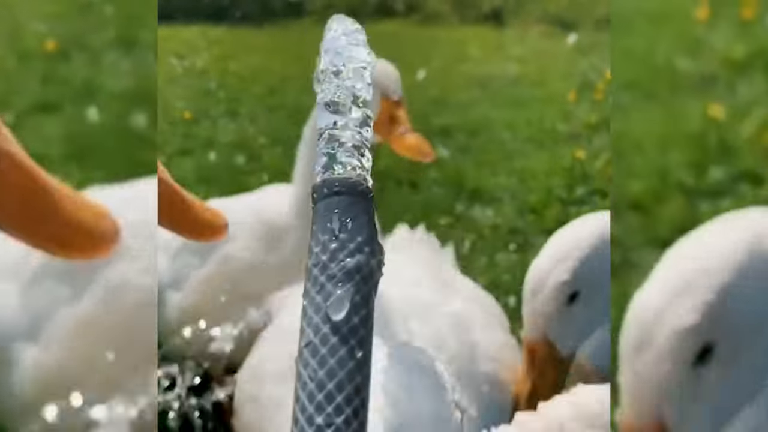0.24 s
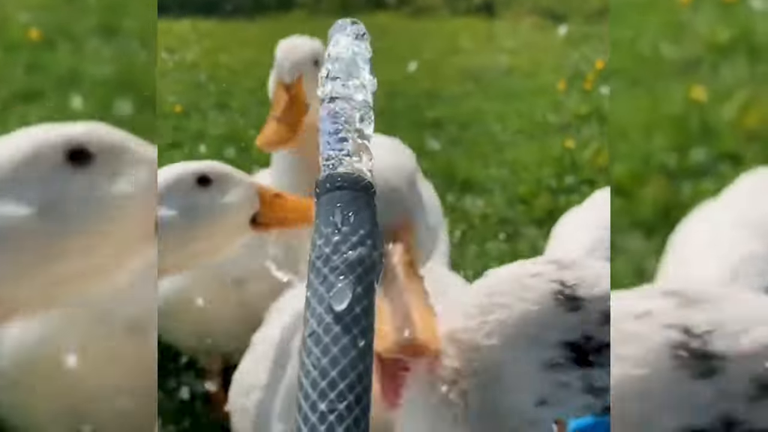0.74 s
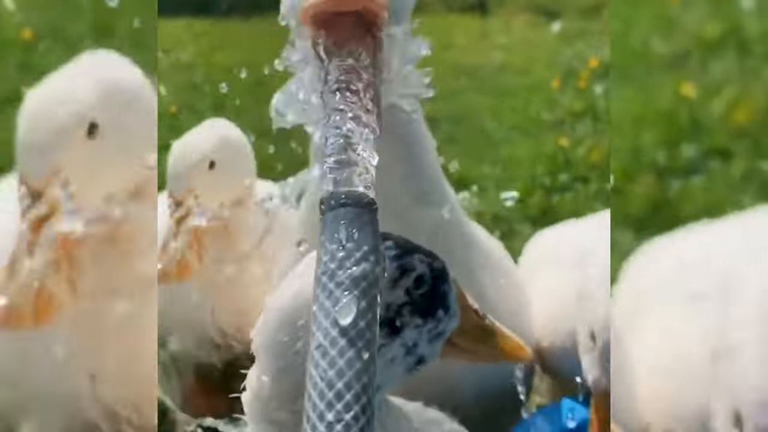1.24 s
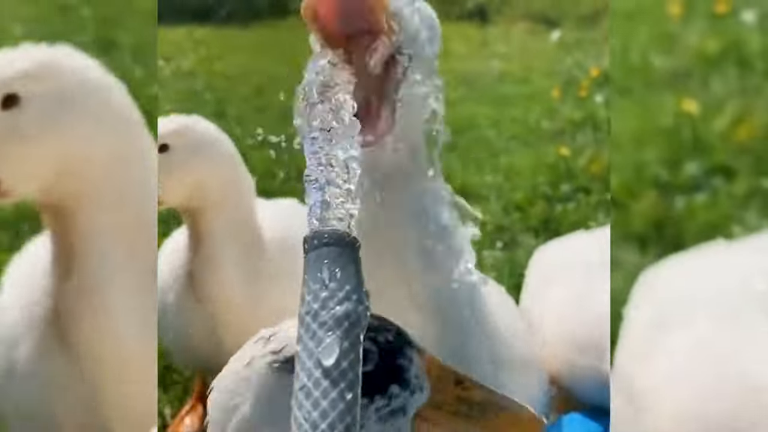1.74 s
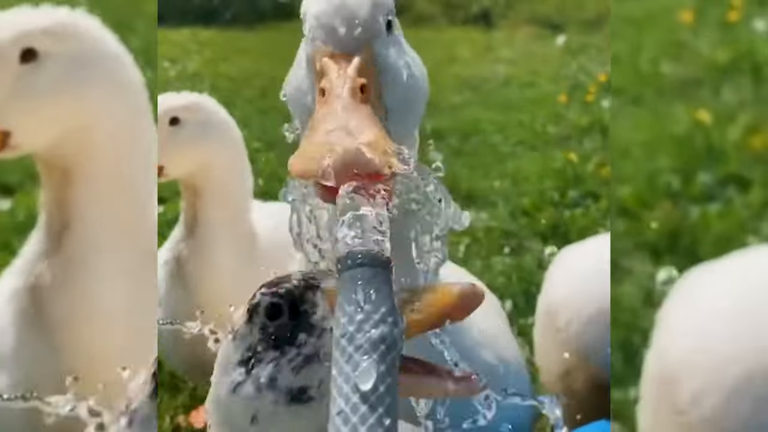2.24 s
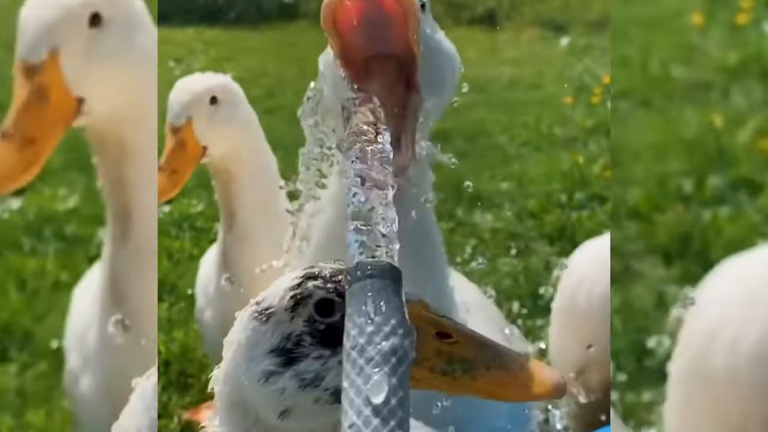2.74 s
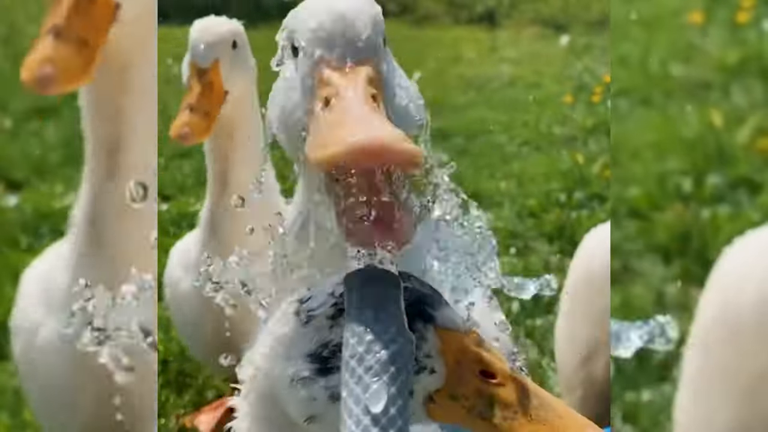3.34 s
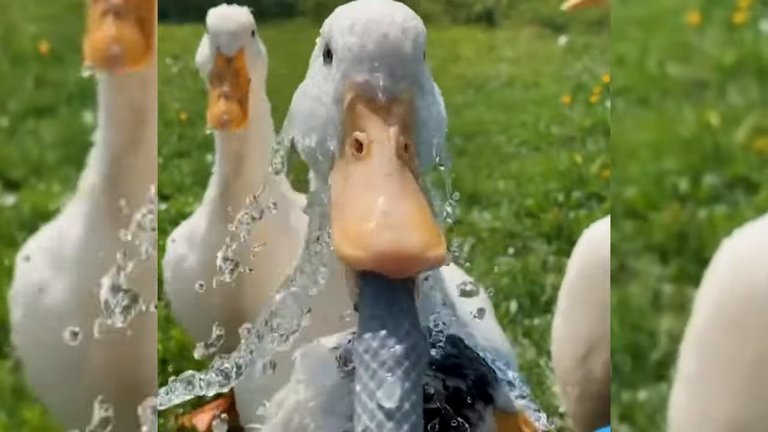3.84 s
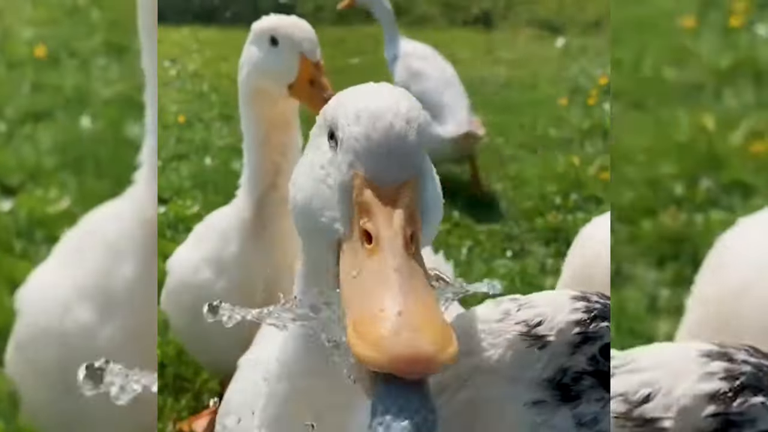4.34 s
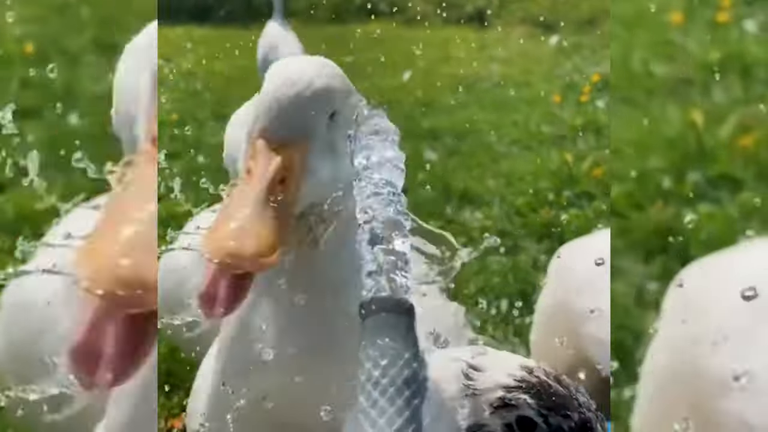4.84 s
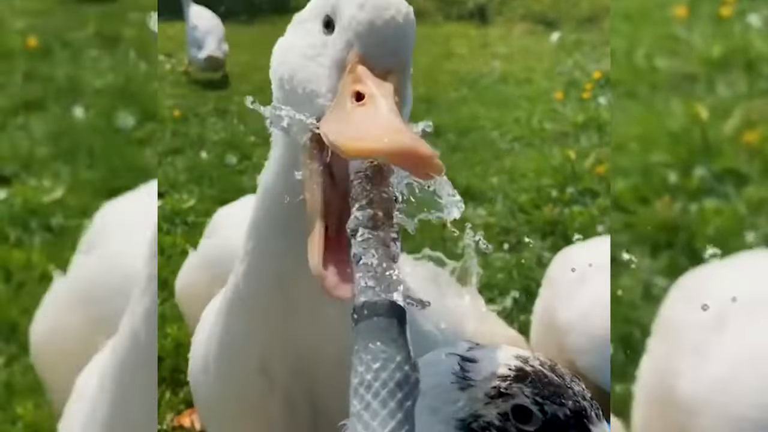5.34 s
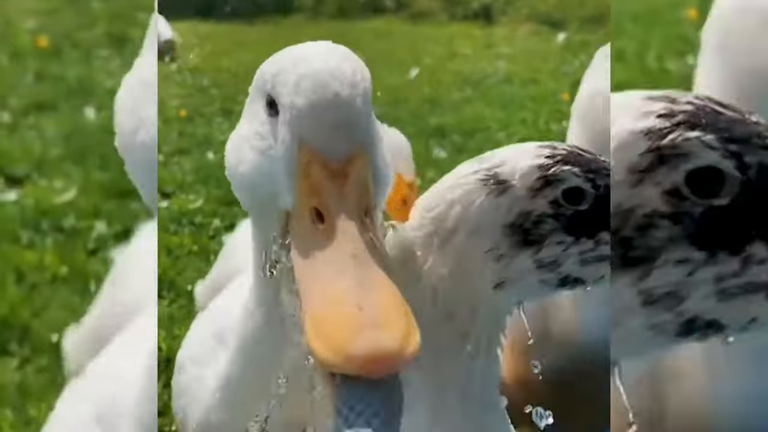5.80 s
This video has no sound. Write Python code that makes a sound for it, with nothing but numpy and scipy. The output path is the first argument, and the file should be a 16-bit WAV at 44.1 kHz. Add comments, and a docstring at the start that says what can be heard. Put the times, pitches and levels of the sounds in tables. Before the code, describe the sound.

Ducks crowd a running hose on a lawn, giving short hoarse quacks and squeaks while bills clap and water splashes close by.

```python
"""Ducks crowd round a running garden hose on a lawn and snap at the jet, close to the microphone.
Near quacks are pulse trains ringing throat and chest; thin near-sine squeaks, mostly falling, precede many.
Bills clap as clicks in a mouth cavity, slaps of water are noise bursts, drips are rising sines.
Behind them the flock chatters in slow pulses, ringing grains make the splash, spray and lapping,
and low noise buffets the microphone."""
import sys
import numpy as np
from scipy import signal
from scipy.fft import rfft, irfft, next_fast_len
from scipy.io import wavfile
from scipy.ndimage import uniform_filter1d, map_coordinates

SR = 44100
rng = np.random.default_rng(int(sys.argv[2]) if len(sys.argv) > 2 else 0)


def bounce(signal):
    """Save signal as a 16-bit WAV file at the path given by the first command-line argument."""
    frames = np.transpose(np.atleast_2d(signal))
    limited = np.clip(frames, -1, 1)
    pcm = np.round(limited * 32767).astype(np.int16)
    wavfile.write(sys.argv[1], SR, pcm)


N = 267642
TIME = np.arange(N) / SR
# In all tables, levels in dB are relative: most layers add their own trim.


def from_db(db):
    """Decibels to amplitude."""
    return 10 ** (np.asarray(db) / 20)


def rms_one(x):
    """Scale to an rms of 1."""
    return x / np.sqrt(np.mean(x ** 2) + 1e-20)


def in_time(rows, t=TIME):
    """Columns of a curve over time, joined by straight lines."""
    s, *columns = np.transpose(rows)
    return [np.interp(t, np.sort(s), column) for column in columns]


def progress(seconds):
    """From 0 to 1 over a length of time."""
    return np.linspace(0, 1, max(int(seconds * SR), 2))


def add(out, s, x):
    """Mix x in at time s."""
    i = max(int(s * SR), 0)
    out[..., i:i + x.shape[-1]] += x[..., :max(N - i, 0)]


def coloured(x, points):
    """Filter by a spectrum joined up over log frequency."""
    hz, db = np.transpose(points)
    size = next_fast_len(N + 4096)
    grid = np.maximum(np.arange(size // 2 + 1) * SR / size, 1)
    gain = from_db(np.interp(np.log(grid), np.log(hz), db))
    return irfft(rfft(x, size) * gain, size)[..., :N]


def drift(rate, size):
    """A wandering line through normal random values, rate of them a second."""
    steps = np.arange(size) * rate / SR
    count = int(steps[-1]) + 2
    return np.interp(steps, np.arange(count), rng.standard_normal(count))


def ring(x, hz, t60):
    """A unit click sets a sine of height 1 ringing; it falls 60 dB in t60 seconds."""
    r, w = from_db(-60 / (t60 * SR)), 2 * np.pi * hz / SR
    return signal.lfilter([0, np.sin(w)], [1, -2 * r * np.cos(w), r * r], x + 1e-18)


def resonate(x, modes):
    """Parallel resonances of (Hz, width in Hz, dB), signs alternating."""
    out = 0
    for k, (hz, width, db) in enumerate(modes):
        t60 = np.log(1000) / np.pi / width
        out = out + (-1) ** k * from_db(db) * width * ring(x, hz, t60)
    return out


def syrinx(pitch, rough, jitter=.065, shimmer_db=5.5, air=.2, closing=1.0, air_hz=1800):
    """One pulse a cycle, uneven in time and strength, each followed by a puff of bright turbulent air."""
    size = len(pitch)
    cycles = np.cumsum(pitch * (1 + jitter * rough * drift(300, size))) / SR
    clicks = np.diff(np.floor(cycles), prepend=-1)
    pulses = clicks * from_db(shimmer_db * rough * drift(398.6, size))
    bright = signal.butter(1, air_hz, "high", fs=SR, output="sos")
    turbulence = signal.sosfilt(bright, rng.standard_normal(size))
    return pulses + air * rough * np.exp(-closing * (cycles % 1)) * turbulence


# Every quack swells and dies by the same law: depths in dB, and how each slope bends.
SWELL_DB, SWELL_BEND, FADE_DB, FADE_BEND = 17, 1.3, 22, 1.6
PITCH_BEND = 1.3   # the pitch lingers near its value at the loudest moment


def blow(attack, release, opening_hz, loudest_hz, closing_hz):
    """Pitch and level (dB under the peak) of one push of air: it builds, then slackens."""
    before, after = 1 - progress(attack), progress(release)
    rise = loudest_hz + (opening_hz - loudest_hz) * before ** PITCH_BEND
    fall = loudest_hz + (closing_hz - loudest_hz) * after ** PITCH_BEND
    db = -np.r_[SWELL_DB * before ** SWELL_BEND, FADE_DB * after ** FADE_BEND]
    return np.r_[rise, fall], db


# Throat resonances by kind of voice. Each row: centre in Hz, width in Hz, level in dB.
THROAT_MODES = { "hoarse": [(440, 77, -5.5), (690, 500, -27), (850, 266, -2.5), (1320, 130, 1.5),
                (1640, 160, 0), (2440, 480, -6), (3500, 1020, -15.5), (5470, 410, -9), (7490, 720, -16.5),
                (11100, 2800, -31)], "bright": [(500, 100, -5), (1050, 820, -7.5), (1650, 304, 1.5),
                (2700, 380, -5.5), (3870, 1800, -11.5), (6140, 1070, -11.5), (7500, 440, -7.5),
                (11700, 8100, -28)], "brassy": [(546, 150, -2.5), (830, 160, 0), (1330, 213, 7.5),
                (1670, 260, -12), (2570, 330, -10), (3370, 390, 2.5), (3800, 135, 7.5), (5450, 1800, -8),
                (7900, 540, -18), (11400, 15000, -32.5)], "throaty": [(450, 180, -17.5), (810, 900, -9.5),
                (1200, 270, 4.5), (1610, 280, -4), (2320, 770, -6.5), (3150, 1000, -8.5)],
                "soft": [(800, 520, -13.5), (1200, 210, -0.5), (1362, 260, -5.5), (1750, 217, -10.5),
                (2100, 170, -52), (3390, 240, -27)]}
# Near quacks. Each row: throat, loudest moment in seconds, attack in seconds, release in seconds,
# level in dB, opening pitch in Hz, pitch when loudest in Hz, closing pitch in Hz,
# roughness [0-1] at full effort, chest level in dB.
NEAR_QUACKS = [ ("throaty", .328, .006, .045, -33, 335, 330, 280, 1, 0),
               ("throaty", .367, .016, .032, -30, 295, 246, 160, 1, 0),
               ("hoarse", .820, .040, .036, -23, 510, 435, 360, .54, -13),
               ("hoarse", 1.115, .068, .042, -23, 450, 390, 335, .58, -4),
               ("throaty", 1.148, .012, .022, -28, 210, 172, 157, .4, 4),
               ("throaty", 1.428, .036, .022, -31, 270, 200, 159, .45, 13),
               ("hoarse", 1.620, .052, .048, -19.5, 500, 260, 143, .3, 4),
               ("throaty", 1.728, .034, .038, -25.5, 260, 195, 150, .33, 12),
               ("hoarse", 1.975, .048, .046, -15, 460, 275, 165, .26, 0),
               ("soft", 2.128, .018, .016, -30, 219, 190, 154, .38, -7),
               ("soft", 2.401, .034, .027, -24, 172, 185, 145, .59, -13),
               ("bright", 3.134, .026, .046, -16, 250, 237, 190, .41, -40),
               ("brassy", 3.402, .04, .051, -14.8, 200, 280, 200, .36, -37),
               ("throaty", 3.793, .036, .018, -32.5, 250, 190, 165, .5, -19),
               ("soft", 4.260, .035, .04, -37, 225, 191, 160, .38, -12),
               ("throaty", 4.308, .055, .036, -39, 410, 438, 410, .16, -29),
               ("soft", 4.574, .022, .04, -32, 164, 146, 130, 1, -6),
               ("hoarse", 4.815, .062, .04, -22.5, 500, 439, 380, .62, -9),
               ("throaty", 4.846, .012, .024, -29, 230, 207, 181, .7, -3),
               ("soft", 5.673, .026, .035, -15.5, 160, 201, 139, .05, -30)]


def quacks(crop_hz=680, crop_width_hz=260, crop_db=-6.5, chest_hz=195, chest_width_hz=170, low_cut_hz=150,
           level_db=0.3, sag=.03, slack=0.31, dull_hz=3000, treble_fade=0.22):
    """Pulses ring the throat and, in the nearest birds, chest and neck; weak blowing is rougher and duller."""
    out = np.zeros(N)
    low_cut = signal.butter(2, low_cut_hz, "high", fs=SR, output="sos")
    dull = signal.butter(1, dull_hz, fs=SR, output="sos")
    for throat, s, attack, release, peak_db, opening_hz, loudest_hz, closing_hz, rough, chest_db in NEAR_QUACKS:
        pitch, db = blow(attack, release, opening_hz, loudest_hz, closing_hz)
        effort, size = from_db(db), len(db)
        # the resonances sink as the bill closes: the throat plays ever more slowly, the pitch made up for it
        speed = np.linspace(1 + sag, 1 - sag, size)
        place = np.cumsum(speed)
        throat_pitch = np.interp(np.arange(size), place, pitch / speed)
        pulses = syrinx(throat_pitch, rough * (1 + slack * (1 - effort)))
        chest = (chest_hz, chest_width_hz, chest_db)
        crop = (crop_hz, crop_width_hz, chest_db + crop_db)
        voice = resonate(pulses, [chest, crop] + list(THROAT_MODES[throat]))
        voice = signal.sosfilt(low_cut, map_coordinates(voice, [place], order=3))
        low = signal.sosfilt(dull, voice)
        voice = low + (voice - low) * effort ** treble_fade
        # even out the loudness, so that effort alone shapes it
        voice /= np.sqrt(uniform_filter1d(voice ** 2, size=600) + 1e-9)
        shape = effort * from_db(peak_db + level_db) * signal.windows.tukey(size, .08)
        add(out, s - attack, voice * shape)
    return out


# A squeak swells, peaks part-way through and fades, while its glide levels off.
SQUEAK_SWELL_DB, SQUEAK_PEAK_SHARE, SQUEAK_FADE_DB, SQUEAK_GLIDE_BEND = 13, .6, 6, 1.6
# Short squeaks, most of them just before a quack.
# Each row: start in seconds, length in seconds, first pitch in Hz, last pitch in Hz, level in dB.
SHORT_SQUEAKS = [(.318, .045, 1200, 1500, -38), (.768, .055, 1294, 1050, -28.5),
                 (1.052, .078, 1420, 1160, -27.5), (1.555, .05, 1314, 1000, -31),
                 (1.912, .052, 1483, 1090, -26), (3.086, .034, 1060, 910, -35),
                 (3.352, .042, 1400, 980, -22), (3.592, .03, 950, 790, -42), (3.762, .036, 930, 870, -36.5),
                 (4.762, .052, 1427, 1140, -28), (5.51, .045, 1010, 950, -44),
                 (5.624, .035, 1050, 870, -35)]


def squeaks(flutter_db=2.6, second_db=-16, third_db=-23, level_db=3.0):
    """The syrinx sings a short, wavering near-sine with two faint overtones."""
    out = np.zeros(N)
    for s, length, first_hz, last_hz, peak_db in SHORT_SQUEAKS:
        u = progress(length)
        size = len(u)
        pitch = last_hz + (first_hz - last_hz) * (1 - u) ** SQUEAK_GLIDE_BEND
        drop_db = np.interp(u, [0, SQUEAK_PEAK_SHARE, 1], [SQUEAK_SWELL_DB, 0, SQUEAK_FADE_DB])
        waver = 1 + .025 * drift(700, size) + .03 * drift(2500, size)
        phase = 2 * np.pi * np.cumsum(pitch * waver) / SR
        tone = np.sin(phase) + from_db(second_db) * np.sin(2 * phase) + from_db(third_db) * np.sin(3 * phase)
        level = from_db(peak_db - drop_db + level_db + flutter_db * drift(646, size))
        add(out, s, np.sqrt(2) * tone * level * signal.windows.tukey(size, .2))
    return out


# Bills clapping and gulping in the jet.
# Each row: start in seconds, peak in dB, low thump in dB and hollow ring in dB (both scaled by their shares).
BILL_SNAPS = [(.072, -30, -13, -4), (.284, -29.5, 1, -7), (.327, -21, -14, -5), (.333, -23.5, -6, -8),
              (.36, -27, 4, -15), (.39, -24, 5, -3), (.53, -27, -10, 0), (.558, -26.5, 1, -4),
              (.737, -26.5, 10, 2.5), (.86, -22.5, -10, -3.5), (1.026, -28, -9, -18), (1.147, -16, -24, 4),
              (1.409, -26, -3, 9), (1.535, -21.5, -8, -.5), (1.893, -23, -20, -9.5), (2.344, -29, 17, -2),
              (3.056, -28, -33, -7.5), (3.316, -29, -34, 6), (3.335, -24, -25, -4.5), (3.619, -30, -21, 13),
              (3.798, -23.5, -18, -8), (4.248, -28, -34, -8), (4.541, -31, -19, -6),
              (4.564, -23.5, -24, -4), (4.744, -29, -20, -5.5), (4.797, -25, 0, -15), (4.899, -33, -8, -25),
              (4.962, -30.5, -40, 1), (5.598, -35, -17, -3)]
# Bill and mouth cavity. Each row: resonance in Hz at middle gape, level in dB, 60 dB decay in seconds.
BILL_MODES = [(200, -4.5, 0.033), (400, -8.5, .022), (606, -9, 0.022), (844, -13, 0.034),
              (1050, -8.5, 0.012), (1330, -7, 0.017), (1700, -8.5, .012), (2650, -17, 0.0083)]


def snaps(wet_s=0.0055, wet=0.1, level_db=0.5, thump_share=0.47, ring_share=1.0):
    """Each clap is a click and a short squelch that ring the mouth cavity, a little differently each time."""
    out, t = np.zeros(N), TIME[:SR // 10]
    for s, db, thump_db, hollow_db in BILL_SNAPS:
        squelch = wet * rng.standard_normal(len(t)) * np.exp(-t / wet_s)
        push = (t == 0) + squelch
        gape = rng.uniform(.92, 1.08)
        sound = 0
        for hz, mode_db, t60 in BILL_MODES:
            colour_db = np.interp(hz, [350, 650, 1100], [thump_share * thump_db, -3, ring_share * hollow_db])
            sound = sound + rng.choice([-1, 1]) * from_db(mode_db + colour_db) * ring(push, hz * gape, t60)
        add(out, s, sound / np.abs(sound).max() * from_db(db + level_db))
    return out


SPATTER_ATTACK_S, SPATTER_DECAY_S = .0006, .0028
# Sharp spatters. Each row: start in seconds, level in dB.
WATER_SLAPS = [(.029, -32), (.329, -35), (.552, -27.5), (.954, -26), (1.244, -29), (1.432, -33),
               (1.834, -23.5), (1.908, -24), (2.067, -27), (2.13, -21), (2.153, -27), (2.554, -24.5),
               (2.568, -29), (2.8, -26.5), (2.899, -32), (3.296, -22), (3.617, -21), (3.682, -26.5),
               (3.726, -27), (3.872, -24), (3.982, -32), (4.135, -32), (4.45, -28), (4.763, -28),
               (4.89, -27), (5.269, -22.5), (5.342, -29), (5.517, -24), (6.018, -28)]
# Spectrum of a spatter. Each row: frequency in Hz, density in dB per Hz.
SLAP_SPECTRUM = [(400, -15), (1500, 0), (3500, -3.5), (6000, 7.5), (7500, 4), (9000, -1), (11000, 4.5),
                 (15500, -7)]


def spatters(level_db=6.0, tail_db=-10, tail_s=0.042, per_s=900):
    """Water slaps on bills and feathers: a crack of noise, then a brief shower of droplets."""
    out, t = np.zeros(N), TIME[:SR // 14]
    for s, db in WATER_SLAPS:
        shower = (rng.random(len(t)) < per_s / SR) * from_db(tail_db) * np.exp(-t / tail_s)
        crack = (1 - np.exp(-t / SPATTER_ATTACK_S)) * np.exp(-t / SPATTER_DECAY_S) / 2
        slap = (crack + shower) * rng.standard_normal(len(t))
        add(out, s, slap * from_db(db + level_db))
    return coloured(out, SLAP_SPECTRUM)


# Single drips. Each row: start in seconds, starting bubble pitch in Hz, approximate peak in dB.
SINGLE_DRIPS = [(0.082, 3840, -34), (0.527, 3010, -39), (1.388, 3960, -28.5), (3.296, 3720, -26.5),
                (3.315, 2190, -32.5), (3.487, 2550, -37.5), (3.506, 2700, -33.5), (3.681, 3500, -27),
                (3.851, 3150, -30), (4.538, 1330, -28), (5.482, 5740, -25), (5.571, 4080, -29.5),
                (5.893, 2730, -33.5), (6.042, 2730, -32.5)]


def drips(cycles=12.0, rise=6.5, level_db=0.0, wobble=0.074):
    """A trapped bubble rings unsteadily and rises in pitch (rise: share of the pitch per second)."""
    out, t = np.zeros(N), TIME[:SR // 25]
    for s, hz, db in SINGLE_DRIPS:
        age = t * hz / cycles
        pitch = hz * (1 + rise * t + wobble * drift(1800, len(t)))
        phase = 2 * np.pi * np.cumsum(pitch) / SR
        fade = 2 * (np.exp(-age) - np.exp(-5 * age))
        add(out, s, from_db(db + level_db) * fade * np.sin(phase))
    return out


# Chatter of the flock. Each row: middle in seconds, length in seconds (stretched by 1.3 when played),
# level in dB, throat in Hz (the two resonances lie at multiples of it).
FLOCK_CHATTER = [(0.128, 0.06, -45, 1960), (0.411, 0.072, -45.0, 1990), (0.605, 0.088, -44.0, 1990),
                 (0.9, 0.065, -46, 1920), (0.988, 0.049, -48, 2020), (1.381, 0.058, -40.5, 1840),
                 (1.88, 0.05, -40, 1750), (2.05, 0.072, -42.5, 1870), (2.233, 0.063, -44, 1980),
                 (2.602, 0.097, -39.5, 1860), (2.74, 0.05, -49, 1750), (2.929, 0.059, -45.5, 1660),
                 (3.026, 0.06, -45, 1980), (3.235, 0.073, -44.5, 2000), (3.544, 0.062, -45.5, 2010),
                 (3.719, 0.096, -37, 2080), (3.917, 0.076, -41.5, 1710), (4.125, 0.054, -44.5, 1970),
                 (4.234, 0.05, -43.5, 1600), (4.396, 0.064, -39, 2080), (4.448, 0.053, -39.5, 1640),
                 (4.593, 0.063, -39, 1980), (4.978, 0.07, -44.5, 1670), (5.229, 0.047, -46, 1930),
                 (5.378, 0.064, -40.5, 1780), (5.473, 0.05, -44.5, 1910), (5.848, 0.036, -38.5, 1750),
                 (6.046, 0.06, -37.5, 1860)]


def flock(pulse_hz=92, rough=.3, lower=0.778, upper=1.05, width_hz=330, upper_db=-3, level_db=2.0,
          top_hz=3000, bottom_hz=1250):
    """Birds further off chuckle in short runs of slow, separate pulses."""
    out = np.zeros(N)
    band = signal.butter(2, [bottom_hz, top_hz], "band", fs=SR, output="sos")
    for s, length, db, hz in FLOCK_CHATTER:
        size = int(1.3 * length * SR)
        pitch = pulse_hz * np.exp(.12 * rng.standard_normal()) * np.linspace(1.12, .88, size)
        pulses = syrinx(pitch, rough, jitter=.15, air=0.45, closing=1.76)
        voice = resonate(pulses, [(hz * lower, width_hz, 0), (hz * upper, width_hz * 2.7, upper_db)])
        voice = rms_one(signal.sosfilt(band, voice)) * signal.windows.tukey(size, .75)
        add(out, s - size / SR / 2, voice * from_db(db + level_db))
    return out


# Difference between the two microphone ports for the birds straight ahead.
# Each row: frequency in Hz, side over mid in dB.
FRONT_WIDTH = [(60, -13.5), (250, -7), (450, -6.5), (800, -9), (1250, -17), (2000, -9), (2500, -18),
               (3700, -21), (5600, -8.5), (8400, -7.5), (12000, -2), (15500, -2)]


def at_ports(x, scatter=0.4):
    """The ports' difference lies a quarter cycle off their sum, rippled by a short random filter that widens it."""
    t = TIME[:SR // 70]
    ripple = rng.standard_normal(len(t)) * np.exp(-t / .003)
    ripple = np.r_[-ripple[::-1], 0, ripple]    # odd in time: both ports stay equally loud
    rippled = signal.fftconvolve(x, ripple / np.linalg.norm(ripple), "same")
    quarter = signal.hilbert(x, next_fast_len(N)).imag[:N]
    side = coloured(np.sqrt(1 - scatter) * quarter + np.sqrt(scatter) * rippled, FRONT_WIDTH)
    return np.array([x + side, x - side])


# Difference between the two ports for sound from all around.
# Each row: frequency in Hz, side over mid in dB.
SURROUND_WIDTH = [(60, -13.5), (200, -6), (400, -3), (800, -5), (1250, -11), (2000, -10), (2500, -19),
                  (3700, -22), (5600, -9), (8400, -7), (12000, -2), (15500, -2)]


def scattered(pair):
    """Sources all around: sum and difference are unrelated."""
    side = coloured(pair[1], SURROUND_WIDTH)
    return np.array([pair[0] + side, pair[0] - side])


def droplets(colour, per_s, spread_db, hiss, cycles, clump_db):
    """Droplets of all sizes burst in clumps and ring a few cycles, over a smooth hiss."""
    pitches = np.geomspace(colour[1][0], colour[-1][0] * 0.97, num=16)
    count = int(per_s * N / SR / len(pitches))
    grains = np.zeros((2, N))
    for hz in pitches:
        clicks, at = np.zeros((2, N)), rng.integers(0, N, count)
        sizes = from_db(spread_db * np.minimum(rng.exponential(1, count), 5))
        clicks[:, at] = sizes * rng.choice([-1, 1], (2, count))
        grains += hz * ring(clicks, hz, cycles / hz)
    clumps = from_db(clump_db * (drift(25, N) + drift(120, N)))
    wet = clumps * (rms_one(grains) + hiss * rng.standard_normal((2, N)))
    return scattered(rms_one(coloured(wet, colour)))


# The jet breaking up on the birds. Each row: time in seconds, splash in dB, spray in dB.
JET_LEVELS = [(0.0, -49.0, -51.5), (0.24, -54.5, -65.0), (0.48, -54.5, -58.0), (1.04, -55.5, -60.0),
              (1.28, -46.0, -47.0), (2.0, -47.0, -52.5), (2.16, -42.5, -44.5), (2.24, -52.0, -56.0),
              (2.4, -48.0, -53.0), (2.48, -58.5, -55.5), (2.56, -47.0, -50.0), (2.72, -57.0, -56.5),
              (2.8, -51.5, -43.0), (2.88, -57.5, -51.0), (3.04, -55.0, -48.5), (3.28, -45.5, -50.0),
              (3.52, -52.0, -55.5), (3.76, -42.5, -49.5), (4.0, -49.5, -51.0), (4.56, -45.5, -49.0),
              (5.12, -55.0, -60.5), (5.68, -41.5, -48.0), (5.76, -49.0, -53.0), (6.07, -47.5, -52.5)]
# Lapping of the water. Each row: time in seconds, level in dB.
LAPPING_LEVELS = [(0.0, -51), (0.2, -51), (0.44, -56), (1.42, -54), (1.57, -50), (1.69, -54), (2.3, -56),
                  (2.5, -62), (3.48, -62), (3.85, -58), (4.63, -59), (4.92, -56), (5.09, -60), (5.34, -59),
                  (5.49, -54), (6.07, -59)]
# Spectra of splash, spray and lapping. Each row: frequency in Hz, density in dB per Hz.
SPLASH_SPECTRUM = [(500, -21), (1200, 1.5), (2500, 3), (3800, 2.5), (5600, 4.5), (7300, 2), (9000, -19.5),
                   (11000, -26), (16000, -31)]
SPRAY_SPECTRUM = [(5000, -45), (9000, -8), (10800, 2), (12500, -1.5), (14000, -2.5), (15300, 0),
                  (17000, -16)]
LAPPING_SPECTRUM = [(120, -4), (185, 8), (255, -34.5), (330, -10), (430, -2), (600, -2.5), (900, 1.5),
                    (1400, -1.5), (2500, -17), (5000, -29.5)]


def water(splash_db=3.0, spray_db=4.6, lapping_db=3.0):
    """The jet breaks up into splash and fine spray and laps on the birds and the ground."""
    splash, spray = in_time(JET_LEVELS)
    lapping, = in_time(LAPPING_LEVELS)
    splashing = droplets(SPLASH_SPECTRUM, per_s=2000, spread_db=3.9, hiss=1.0, cycles=21.0, clump_db=3.43)
    spraying = droplets(SPRAY_SPECTRUM, per_s=1500, spread_db=3.0, hiss=1.0, cycles=8.5, clump_db=5.2)
    lapped = droplets(LAPPING_SPECTRUM, per_s=900, spread_db=0.5, hiss=1.0, cycles=3.1, clump_db=3.5)
    return (from_db(splash + splash_db) * splashing + from_db(spray + spray_db) * spraying
            + from_db(lapping + lapping_db) * lapped)


PUFF_ATTACK_S, PUFF_RELEASE_S = .016, .028
# Swelling and sinking rumble of air on the microphone. Each row: time in seconds, level in dB.
AIR_LEVELS = [(0.0, -46.0), (0.72, -42.5), (0.8, -36.5), (1.36, -47.5), (1.44, -39.0), (1.68, -40.0),
              (1.76, -39.5), (2.32, -28.5), (2.4, -38.5), (3.04, -49.5), (3.36, -49.0), (6.07, -46.0)]
# Single puffs of air. Each row: peak time in seconds, level in dB.
AIR_PUFFS = [(1.04, -32), (1.48, -33), (1.65, -37), (1.93, -37), (2.36, -28), (3.40, -44), (3.63, -44),
             (4.26, -45), (4.6, -46)]
# Spectrum of the rumble. Each row: frequency in Hz, density in dB per Hz.
AIR_SPECTRUM = [(15, -40), (30, -14), (45, -0.5), (65, 5.5), (100, -2), (150, -4), (195, -9.5), (250, -25),
                (700, -42)]


def buffeting(level_db=-1.5, puff_db=0.0, flutter_db=1.2, flutter_per_s=14):
    """Stirred air rumbles unevenly on the microphone, with a few added puffs."""
    db, = in_time(AIR_LEVELS)
    air = from_db(db + level_db + flutter_db * drift(flutter_per_s, N))
    for s, peak_db in AIR_PUFFS:
        away = np.maximum((s - TIME) / PUFF_ATTACK_S, (TIME - s) / PUFF_RELEASE_S)
        air = air + from_db(peak_db + puff_db) * np.exp(-away)
    rumble = rms_one(coloured(rng.standard_normal((2, N)), AIR_SPECTRUM))
    # even out the noise, so that the air curve sets its level
    rumble /= np.sqrt(uniform_filter1d(rumble[0] ** 2, size=4000))
    return air * scattered(rumble)


def garden(x, wet_db, t60):
    """Faint, dull scatter from the ground and hedges: a short decaying noise echo."""
    t = TIME[:SR // 2]
    echo = rng.standard_normal((2, len(t))) * from_db(-60 * t / t60)
    band = signal.butter(2, [500, 3500], "band", fs=SR, output="sos")
    echo = signal.sosfilt(band, echo / np.linalg.norm(echo[0]))
    return from_db(wet_db) * scattered(signal.fftconvolve(x[None], echo, axes=1)[:, :N])


def scene():
    """Near birds and water in front, the flock further out on the lawn."""
    near, far = quacks() + squeaks(), flock()
    close = near + far + snaps() + spatters() + drips()
    echoes = garden(near, wet_db=-17, t60=0.14) + garden(far, wet_db=-6.5, t60=0.22)
    return at_ports(close) + echoes + water() + buffeting()


CUTOFF_HZ = 15700
# Overall colour: narrow gaps near 4.7, 10.3 and 14.3 kHz, a thin ring at 8.4 kHz.
# Each row: centre in Hz, width in Hz, gain at the centre in dB.
OVERALL_COLOUR = [(4656, 1150, -75), (8424, 29, 14.5), (10300, 400, -62.5), (14300, 500, -14)]


def record(dry):
    """Narrow gaps and a thin ring colour the treble; the top is cut."""
    for hz, width, db in OVERALL_COLOUR:
        b, a = signal.iirpeak(hz, hz / width, fs=SR)
        dry = dry + (from_db(db) - 1) * signal.lfilter(b, a, dry)
    return signal.sosfilt(signal.ellip(10, .3, 80, CUTOFF_HZ, fs=SR, output="sos"), dry)


dry = scene()
out = record(dry)
bounce(out)
```